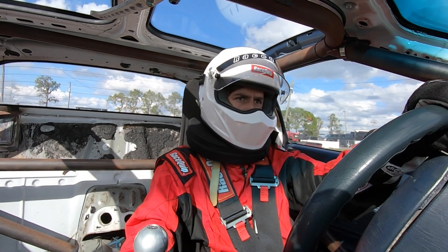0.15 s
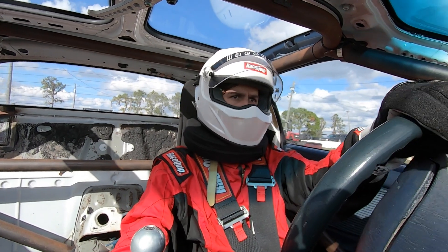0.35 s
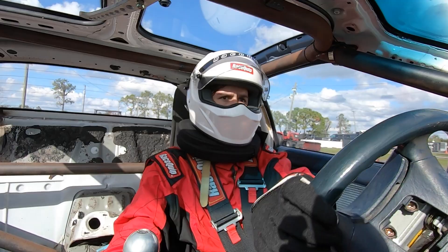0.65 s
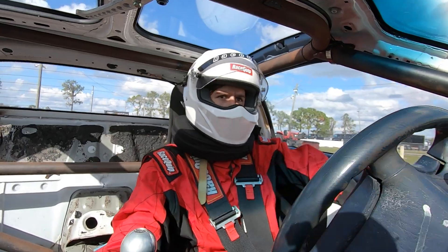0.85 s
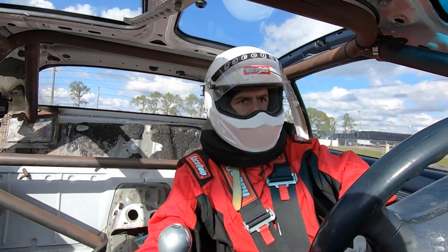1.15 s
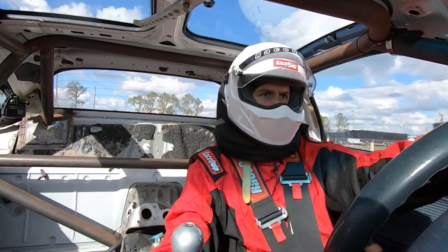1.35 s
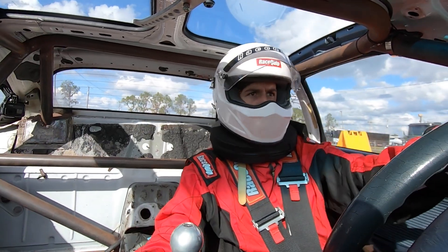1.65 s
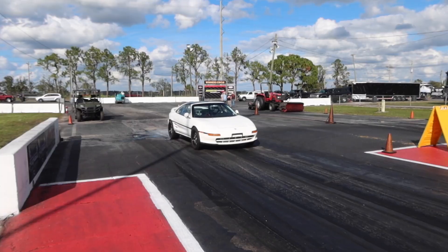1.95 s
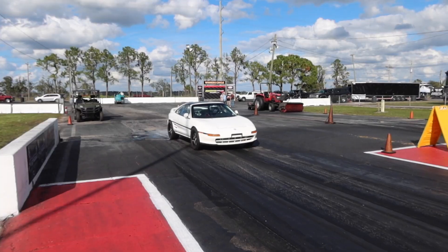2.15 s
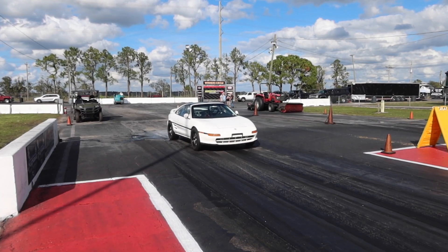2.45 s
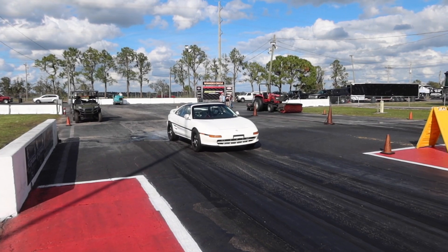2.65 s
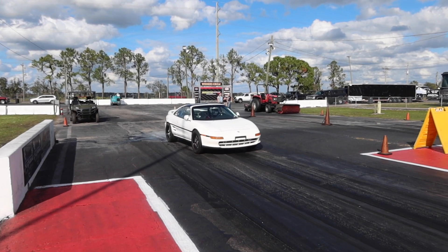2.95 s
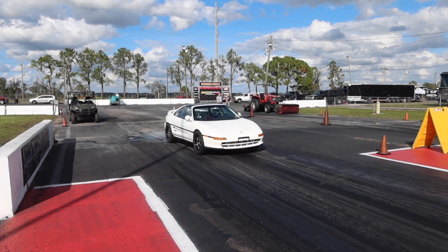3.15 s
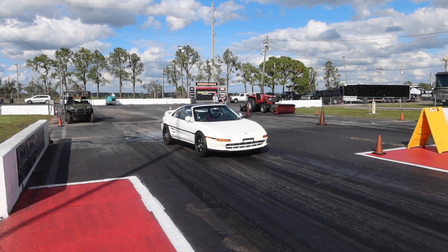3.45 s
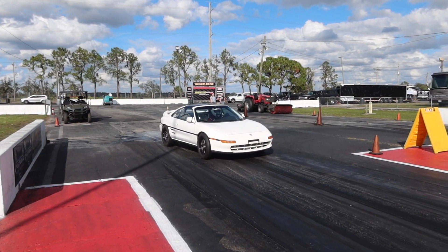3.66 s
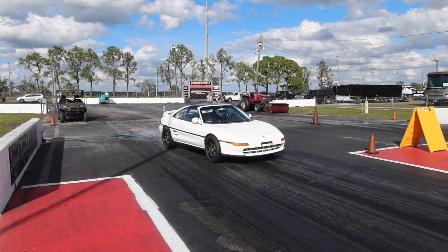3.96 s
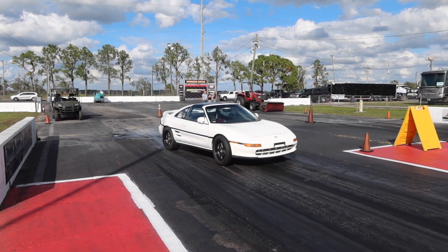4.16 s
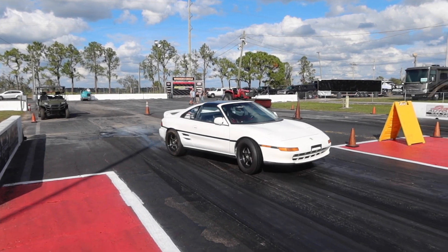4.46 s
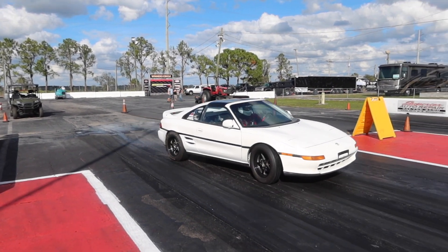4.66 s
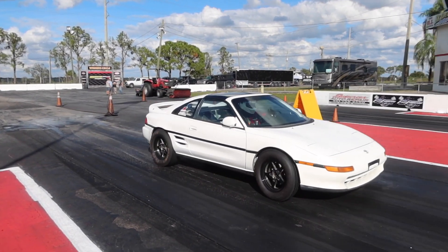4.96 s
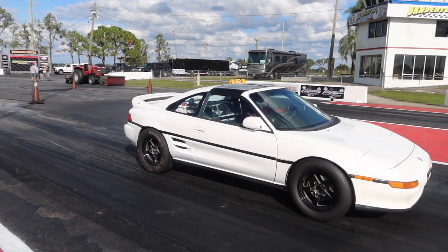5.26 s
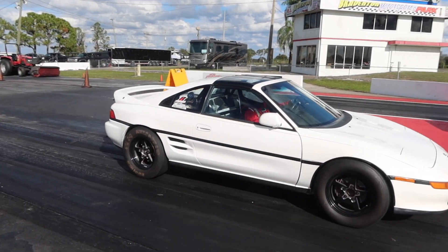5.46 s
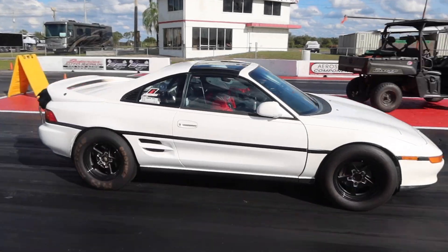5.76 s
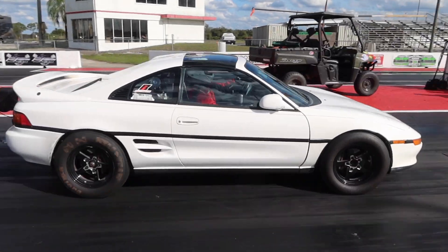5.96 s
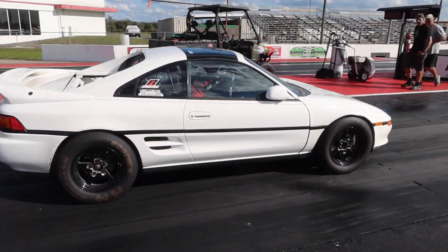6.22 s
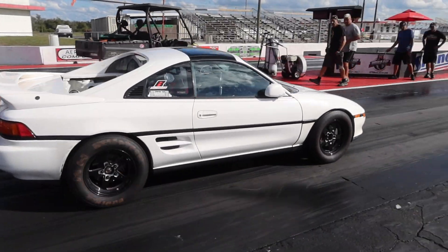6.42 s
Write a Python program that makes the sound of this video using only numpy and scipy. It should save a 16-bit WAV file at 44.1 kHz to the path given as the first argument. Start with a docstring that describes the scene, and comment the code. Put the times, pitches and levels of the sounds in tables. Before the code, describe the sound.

Boomy cabin revving with hiss and rattling shake cuts to trackside limiter stutter, sharp exhaust bangs, a brief rev peak, then lumpy idle.

```python
"""In the stripped cabin of a turbocharged four-cylinder drag car, then beside the strip, on a stereo microphone pair.
Inside: a rev, a short pull and a fall to idle, with hiss and body shake. Outside, in open air: the car stutters on
the launch limiter, revs up, bangs, spins its howling tyres, vents boost, lifts off and rolls past at idle.
The engine is clear orders, filtered firing clicks, puffs of noise and a repeated cycle; bangs are shock fronts with
noise bursts, tyres are sagging tones, and the hisses, shake and air are filtered noise."""
import sys
import numpy as np
from scipy import signal
from scipy.fft import rfft, irfft, next_fast_len
from scipy.io import wavfile
from scipy.ndimage import uniform_filter1d, minimum_filter1d

SR = 44100
rng = np.random.default_rng(int(sys.argv[2]) if len(sys.argv) > 2 else 0)


def wav_out(sig):
    """Save sig, one row per channel (or a flat mono array), as 16-bit PCM at SR to the path in sys.argv[1]."""
    wavfile.write(sys.argv[1], SR, np.round(np.clip(np.atleast_2d(sig).T, -1, 1) * 32767).astype(np.int16))


N = 290619
T = np.arange(N) / SR
HZ = np.fft.rfftfreq(N, 1 / SR)

# moments of the take-over from cabin to trackside, and of the drive [s]
OUTSIDE_S, LIFT_OFF_S, IDLE_S, PASSED_S = 1.926, 4.63, 5.16, 6.25
BOG_START_S, BOG_END_S = 2.44, 2.73  # the engine bogs and its second order comes forward
EDGE_HZ = 15600  # upper band limit

# likeness of the two microphones' noise: (frequency [Hz], left-right correlation)
MIC_LIKENESS = [(100, .985), (350, .95), (700, .5), (1400, .45), (2800, .62), (5000, .42), (10000, .1)]
# narrowing in the open: (frequency [Hz], change of the left-right difference [dB])
OPEN_WIDTH = [(100, -38), (200, -26), (380, -15), (700, -18), (1300, -20), (2400, -14), (4400, -4),
              (8000, -3), (15000, -1)]
# colour of the open-air background: (frequency [Hz], level [dB])
AIR_COLOUR = [(20, -60), (90, 1.5), (300, 0), (900, -8.5), (3000, -13.5), (8000, -30.5), (15000, -46)]
# sound scattered nearby, against the direct sound: (frequency [Hz], level [dB])
SCATTER = [(100, -21), (300, -18), (600, -4), (1200, -1), (2800, -4), (6000, -14)]
OPEN_SCATTER_DB = -12  # change of the scatter in the open
# random fine ripple across the treble's spectrum: depth and spacing
TREBLE_RIPPLE_DB, TREBLE_RIPPLE_HZ = 1.9, 60

# jolts of the body shell, before trim: (time [s], hold [s], level [dB], decay [s])
SHAKE_JOLTS = [(.16, 0.021, -15, 0.1), (.59, 0.066, -26, 0.032), (.96, 0.15, -22, .06),
               (1.7, 0.069, -28, 0.018), (1.86, 0.072, -28.5, .02)]
# colour of the shake: (frequency [Hz], level [dB])
SHAKE_COLOUR = [(10, -13), (22, -1), (45, -11), (75, -25), (130, 0), (300, -62)]
TREMBLE_DB = -60  # steady shake between jolts, before trim

# bursts of vented boost in the cabin, before trim: (time [s], hold [s], level [dB], decay [s])
CABIN_VENTS = [(.175, 0.013, -25, 0.013), (.87, 0.18, -29, 0.24), (1.33, 0.055, -33.5, 0.048)]
# colour of the cabin hiss: (frequency [Hz], level [dB])
CABIN_HISS_COLOUR = [(2500, 0.5), (4500, 2), (6500, 2), (10000, -3.5), (11500, -17.5), (14500, -22),
                     (15500, -42)]
HISS_UNDER_RASP_DB = -3.5  # steady intake hiss in the cabin against the rasp, before trim
# bursts of vented boost at the trackside: (peak time [s], half length [s], level [dB], centre [Hz])
TRACK_VENTS = [(3.687, 0.053, -41.5, 14200), (3.822, 0.05, -40, 13000), (3.936, 0.09, -51, 12500),
               (4.06, .022, -46, 11500), (4.134, .018, -35.5, 8600), (4.191, 0.039, -33, 8400),
               (4.254, 0.021, -34.5, 7500), (4.24, 0.21, -42, 13000), (4.314, .02, -36, 10000),
               (4.528, 0.026, -39, 12000), (4.593, 0.051, -39.5, 9000)]
# colour of the trackside hiss: (frequency [Hz], level [dB])
TRACK_HISS_COLOUR = [(3000, -3), (5000, -2), (7000, -2.5), (9500, -3), (11500, -5), (14000, -11),
                     (15700, -11)]
VENT_Q, VENT_WASH_DB = 3.3, -7  # sharpness of each burst's centre, and the wide hiss around it
# thin hiss once the throttle shuts: (time [s], centre [Hz], level [dB])
WHIRR = [(4.55, 7800, -78), (4.7, 7600, -58), (4.9, 7000, -64), (5.1, 6200, -65), (5.35, 6300, -65),
         (5.6, 6500, -58), (6.1, 6400, -66), (6.59, 6600, -63)]

# howls of the spinning slicks: (peak time [s], half length [s], pitch at the peak [Hz], level [dB], overtones [dB])
HOWLS = [(0.534, 0.06, 241.5, -26.5, -3), (0.842, 0.16, 249.1, -19, -10.5), (4.471, 0.11, 258.5, -21, -32),
         (4.604, 0.031, 251.4, -18, -22)]
HOWL_SAG_HZ_PER_S = 62
# unburnt fuel exploding in the pipe: (time [s], level [dB], decay [s], share of bright snap [0-1])
BANGS = [(1.975, -23, 0.0051, 0.26), (2.153, -24, 0.0068, 0.19), (2.287, -29, 0.0052, .3),
         (2.333, -20.5, 0.0048, 0.1), (2.847, -26, 0.0042, 0.05), (3.059, -11, 0.0066, 0.15),
         (3.12, -12.5, 0.0036, 0.37), (3.267, -12, 0.0059, 0), (3.298, -14, 0.0022, 0),
         (3.412, -12, 0.0043, 0), (3.516, -18, 0.0016, 1), (3.519, -6, 0.0054, 0.2),
         (3.578, -19.5, 0.0038, 0.6), (3.866, -4.5, 0.0044, 0.47), (3.881, -10, 0.0025, 0.4),
         (3.897, -13, 0.0034, 0.34), (3.929, -8, 0.0047, 0.37)]
# colour of the burst: (frequency [Hz], level [dB])
BANG_COLOUR = [(60, -18), (130, 11), (500, 13), (1400, 11.5), (2700, -4), (4500, -41), (8000, -20.5),
               (15000, -42)]
# colour of the snap: (frequency [Hz], level [dB])
SNAP_COLOUR = [(400, -20), (1200, 0), (2500, 0), (4500, -8), (8000, -19), (11000, -36), (15000, -50)]

# engine speed in the cabin: (time [s], firing rate [1/s])
CABIN_SPEED = [(0.0, 275.3), (0.1, 317.0), (0.17, 335.0), (0.27, 325), (0.33, 294), (0.4, 273), (0.47, 234),
               (0.6, 240), (0.86, 216), (0.9, 176.2), (0.98, 146), (1.171, 121.5), (1.317, 106.5),
               (1.423, 91), (1.505, 83), (1.6, 69), (1.925, 65.7)]
# trackside speed, on the limiter with one bog, then the pull and fall to idle: (time [s], firing rate [1/s])
TRACK_SPEED = [(1.926, 234), (2.4, 238.2), (2.446, 204), (2.48, 193), (2.535, 158), (2.6, 172), (2.69, 190),
               (2.75, 205), (2.86, 230), (3.53, 224), (3.6, 246), (3.7, 286), (3.82, 335), (3.89, 333),
               (4.0, 299), (4.09, 260), (4.16, 242), (4.3, 239.4), (4.413, 226.1), (4.52, 223), (4.65, 149),
               (5.086, 94.5), (5.277, 73), (5.5, 67), (5.65, 61), (5.85, 57.5), (6.0, 50), (6.25, 52),
               (6.59, 56.7)]
# exhaust in the cabin: (time [s], bass [dB], bark [dB])
CABIN_LEVEL = [(0.0, -10, -24.5), (0.09, -11, -25.5), (0.36, -13.5, -25.5), (0.65, -13, -22.5),
               (0.74, -11, -27.5), (0.85, -9.5, -29.5), (0.98, -15.5, -30), (1.3, -10, -31.5),
               (1.5, -13, -39.5), (1.75, -24.5, -42), (1.92, -17, -40)]
# exhaust at the trackside: (time [s], bass [dB], bark [dB])
TRACK_LEVEL = [(1.926, -19, -24), (2.02, -18, -25.5), (2.26, -23, -27), (2.33, -18, -25.5),
               (2.6, -15.5, -29.5), (2.75, -14, -24.5), (3.5, -15, -24.5), (3.76, -13, -21),
               (3.92, -18, -25), (4.025, -16.5, -30), (4.1, -24, -34), (4.16, -21, -29), (4.49, -16, -25),
               (4.66, -20.5, -34.5), (5.05, -23.5, -41), (5.3, -31.5, -46.5), (5.58, -33, -45),
               (5.8, -32.5, -46), (6.27, -28.5, -45), (6.59, -23.5, -39)]
# the rasp follows the bark: dB at a bark of 0 dB, dB per dB, extra dB in the cabin
RASP_DB, RASP_SLOPE, CABIN_RASP_DB = -16, 0.74, 8
BOOM_DB, ROUGH_BOOM_DB = -14.5, 13  # smooth boom against the bass, and what roughness 1 adds

# cylinders in firing order: (strength, extra travel time in the manifold [ms])
CYLINDERS = [(0.37, 0.036), (0.38, 0.21), (0.64, 0.073), (0.28, 0.29)]
# spells of uneven firing: in the cabin, on the limiter, in the bog and pull, on the overrun and at idle:
# (start [s], end [s], roughness [0 to about 1], share dropped [0-1])
STUMBLES = [(0.078, 0.221, 0.45, .22), (0.423, 0.704, 0.61, 0.026), (0.926, 1.038, 0.64, .08),
            (1.65, 1.845, 0.27, .08), (1.919, 2.446, 1.03, 0.31), (2.447, 2.699, 0.45, .05),
            (2.844, 2.937, 0.97, 0.22), (2.975, 3.168, 0.89, 0.43), (3.221, 3.329, 0.92, 0.31),
            (3.354, 3.446, 0.78, 0.39), (3.474, 3.503, 0.99, 0.47), (3.558, 3.803, 0.22, .03),
            (3.805, 3.946, 0.75, 0.3), (4.518, 4.651, 0.79, 0.24), (4.643, 5.22, .25, 0.022),
            (5.223, 6.703, 0.25, 0.067)]
STUMBLE_FADE_S = 0.026
SCATTER_SMOOTH, SCATTER_ROUGH = 0.016, 0.19  # spread of firing strength, and what roughness 1 adds
ROUGH_TIMING_MS = .13  # spread of firing times at roughness 1
SPEED_HUNT = .028  # relative wander of the speed at roughness 1
# longer ignition cuts, and a few swells, before levelling: (time [s], half length [s], change [dB])
CUTS = [(1.964, 0.013, -5.5), (2.072, 0.0092, -8), (2.126, 0.01, -8), (2.268, 0.022, -6),
        (2.329, 0.0071, -10.5), (2.399, 0.016, -3), (2.605, 0.016, 1), (2.894, 0.0069, -8.5),
        (2.921, 0.0012, 5), (2.985, 0.0044, 3), (3.13, 0.025, -6), (3.257, 0.013, -4.5),
        (3.293, 0.0071, -6.5), (3.386, 0.02, -4), (3.48, 0.0078, -4.5), (3.503, 0.004, -6),
        (3.858, 0.0031, 6), (3.913, 0.015, -0.5)]
# burbles at idle, before levelling: (time [s], lift [dB])
BURBLES = [(5.615, 0.5), (5.858, 7), (5.934, 7), (6.2, 0), (6.465, 2), (6.54, 5.5)]
BURBLE_HALF_S = 0.0066
GAS_DB_PER_OCTAVE, GAS_PIVOT_HZ = -1, 135  # at high revs the pulses outgrow the rush of gas
PUFF_MOST_DB = 6  # the largest puff of gas above the usual one

# clear engine orders: [multiples of the firing rate]
ORDERS_HEARD = [.5, .75, 1, 1.5, 2, 2.5, 3, 3.5, 4]
# the strongest orders, taken out of the clicks: [multiples of the firing rate]
MAIN_ORDERS = [1, 1.5, 2, 3]
# each clear order against the bass: (cabin [dB], on power [dB], overrun [dB], idle [dB],
# change at roughness 1 [dB], change under boost [dB], change while bogging [dB], waver [dB])
ORDER_DB = [(-26.5, -33, -38, -49, 24, 5.5, -13, 5), (-17.5, -18.5, -47, -38, 2.5, -2, -4, 3.5),
            (-0.5, 2.55, 1.5, -1.5, -15.5, -1, -2.5, 0.92), (-26, -24, -24, -15, 10, -4.5, -9, 4.5),
            (-20, -19.5, -27, -6.5, -0.5, 6.5, 5, 2), (-39.5, -37, -24, -39, 4, 8, 10, 3.5),
            (-23, -23.5, -32.5, -16, 0, 4.5, -3, 3.5), (-59, -50, -24, -22.5, 2, 6, 6, 3),
            (-35.5, -52, -42, -21, -2, 15, 4, 5.5)]
# hard revving under boost, when the overtones snarl: (start [s], end [s])
BOOST = [(-.1, 0.325), (3.56, 3.85)]
BOOST_FADE_S = 0.055
# spells under load with the whole engine cycle's partials clear: (start [s], end [s], level against the gas [dB])
SNARLS = [(-.1, 0.96, -6), (1.1, 1.39, -3), (2.452, 2.856, -4.5), (3.588, 3.842, -6), (4.13, 4.52, -6)]
SNARL_FROM_HZ, SNARL_TO_HZ = 480, 2900

# resonances that lift the upper orders crossing them, in four stages: (centre [Hz], width [Hz], lift [dB])
CABIN_DRONES = [(209.4, 15, 11), (706, 8.5, 8.5), (498, 34, 4.5)]
POWER_DRONES = [(384.5, 23, 8.5), (334, 55, 6.4), (710, 51, 7.5), (906, 66, 2)]
OVERRUN_DRONES = [(325.1, 30.7, 13.5)]
IDLE_DRONES = [(206.3, 17, 11.3), (169, 20, 6.8)]
# colour of the exhaust in the same four stages: (frequency [Hz], level [dB])
CABIN_COLOUR = [(30, -9), (80, 6.5), (120, -1.5), (180, 10.5), (270, 5.5), (400, -7.5), (500, -5.5),
                (590, -10.5), (720, -7.5), (850, -10.5), (1200, -11), (1600, -19), (2050, -22),
                (3300, -22.5), (4500, -28.5), (7000, -81)]
POWER_COLOUR = [(40, -39), (80, -7), (125, -1), (200, -4.5), (380, -3.5), (500, -10.5), (800, -3.5),
                (1400, -18), (2300, -15.5), (3200, -20.5), (4500, -26.5), (7000, -33.5), (10000, -42),
                (15000, -47.5)]
OVERRUN_COLOUR = [(40, -43), (80, -11), (130, 3), (210, 17.5), (270, -5), (335, 8), (385, -8), (460, -25),
                  (550, -18), (800, -13), (1150, -30.5), (1550, -25.5), (2000, -27.5), (3000, -17),
                  (4500, -22.5), (8000, -33.5), (15000, -46.5)]
IDLE_COLOUR = [(40, -30), (80, 8), (120, 13), (170, 14.5), (220, 5), (270, -2.5), (350, 0), (450, -12.5),
               (560, -24.5), (850, -9.5), (1200, -28), (1600, -23), (2000, -27.5), (3000, -26.5),
               (4300, -29.5), (6500, -41.5), (9000, -46.5), (15000, -53)]
# exhaust pipe resonances, before each stage's share: (centre [Hz], width [Hz], lift [dB])
PIPE_MODES = [(139.3, 4.5, 14), (231.3, 8, 18.5), (376, 9.8, 5.5), (709, 36, 5), (920, 30, 4),
              (1388, 68, 13.5), (2990, 29, 3.5)]
# engine bay, ringing once the throttle shuts, before each stage's share: (centre [Hz], width [Hz], lift [dB])
BAY_MODES = [(404, 20.7, 3.5), (664, 46, 5.5), (970, 54.8, 6.5), (1530, 46, 8.5), (1616, 47, -1.5),
             (2160, 170, 7.5), (2829, 56, 0.5), (3900, 60, -3), (5060, 120, 3)]
# tailpipe facing the microphones once the car has passed: (centre [Hz], width [Hz], change [dB])
TAILPIPE_MODES = [(195, 37, -3.5), (430, 48, 9.5)]


def amp(db):
    """Decibels to gain."""
    return np.exp(np.asarray(db) * (np.log(10) / 20))


def curves(rows):
    """The columns of a time table at every sample."""
    s, *columns = np.transpose(rows)
    return [np.interp(T, s, c) for c in columns]


def read(points):
    """A spectrum table at every frequency, on a logarithmic axis."""
    f, value = np.transpose(points)
    return np.interp(np.log(HZ + 1), np.log(f), value)


def smooth(x, seconds):
    """Triangular moving average."""
    size = max(int(seconds * SR), 1)
    return uniform_filter1d(uniform_filter1d(x, size), size)


def unit(x):
    """Scales to rms 1."""
    return x / np.sqrt(np.mean(x ** 2) + 1e-20)


def steady(x, seconds=0.15):
    """Holds the slow level of a stereo sound at rms 1."""
    return x / np.sqrt(abs(smooth((x ** 2).mean(0), seconds)) + 1e-14)


def shape(x, gain):
    """Filters by a gain at every frequency."""
    size = next_fast_len(N + 8192, True)
    spectrum = rfft(x.astype(np.float32), size)
    spectrum *= np.interp(np.fft.rfftfreq(size, 1 / SR), HZ, gain)
    return irfft(spectrum, size)[..., :N].astype(float)


def below(hz, order=5):
    """Gain of a low-pass, steep by default."""
    return 1 / np.sqrt(1 + (HZ / hz) ** (2 * order))


def above(hz):
    """Gain of the matching high-pass."""
    return np.sqrt(1 - below(hz) ** 2)


def after(s, seconds):
    """Fades from 0 to 1 around a moment."""
    return np.clip((T - s) / seconds + .5, 0, 1)


def during(start, end, fade_s):
    """Is 1 within a spell and 0 outside it, with faded edges."""
    return after(start, fade_s) - after(end, fade_s)


def bumps(rows):
    """Sum of brief bell-shaped changes of level, in dB."""
    total = np.zeros(N)
    for s, half, db in rows:
        span = slice(max(int((s - 4 * half) * SR), 0), int((s + 4 * half) * SR))
        total[span] += db * np.exp(-((T[span] - s) / half) ** 2)
    return total


def bursts(rows, attack_s):
    """Gain of events that rise, hold and die away."""
    gain = np.zeros(N)
    for s, hold, db, decay in rows:
        rise = np.clip((T - s) / attack_s, 0, 1)
        gain += amp(db) * rise * np.exp(-np.maximum(T - s - hold, 0) / decay)
    return gain


def resonances(modes):
    """Summed lift of resonance peaks at every frequency, in dB."""
    return sum(db / (1 + ((HZ - hz) / width) ** 2) for hz, width, db in modes)


def noise():
    """White noise on both microphones, alike in the bass and wide in the treble."""
    mid, side = rng.standard_normal((2, N))
    same = np.clip(read(MIC_LIKENESS), -1, 1)
    mid = shape(mid, np.sqrt((1 + same) / 2))
    side = shape(side, np.sqrt((1 - same) / 2))
    return np.array([mid + side, mid - side])


def narrowed(x):
    """Nearly mono below the treble, as a single source sounds in the open."""
    mid = (x[0] + x[1]) / 2
    side = shape((x[0] - x[1]) / 2, amp(read(OPEN_WIDTH)))
    return np.array([mid + side, mid - side])


def treble_ripple():
    """Gain of a random fine ripple over frequency, drawn anew at each call."""
    grid = np.arange(0, SR / 2, TREBLE_RIPPLE_HZ)
    return amp(TREBLE_RIPPLE_DB * np.interp(HZ, grid, rng.standard_normal(len(grid))))


def reflections(x, decay_s=0.021):
    """Nearby panels and walls scatter the sound, differently at each microphone and less in the open."""
    t = np.arange(SR // 8) / SR
    taps = rng.standard_normal((2, len(t))) * (rng.random((2, len(t))) < .03) * np.exp(-t / decay_s)
    taps /= np.linalg.norm(taps, axis=1, keepdims=True)
    echo = signal.fftconvolve(x, taps, axes=1)[:, :N]
    out = after(OUTSIDE_S, .005)
    places = [(1 - out, amp(read(SCATTER))), (out, amp(read(SCATTER) + OPEN_SCATTER_DB))]
    return sum(share * shape(x + shape(echo, wet), 1 / np.sqrt(1 + wet ** 2)) for share, wet in places)


def open_air():
    """Steady background of the open strip: coloured noise."""
    return amp(-46.0) * unit(shape(noise(), amp(read(AIR_COLOUR))))


def rush(gain, colour, trim_db, flutter_db):
    """Turbulent noise that flutters."""
    flutter = flutter_db * unit(smooth(rng.standard_normal(N), 0.023))
    return gain * amp(trim_db + flutter) * unit(shape(noise(), amp(read(colour)) * treble_ripple()))


def body_shake():
    """Jolts of the body shell over a faint tremble, as low noise."""
    gain = amp(TREMBLE_DB) + bursts(SHAKE_JOLTS, attack_s=0.0098)
    return rush(gain, SHAKE_COLOUR, trim_db=3.0, flutter_db=1.5)


def cabin_hiss(rasp):
    """Intake hiss that follows the rasp, with bursts of vented boost."""
    gain = np.hypot(amp(rasp + HISS_UNDER_RASP_DB), bursts(CABIN_VENTS, attack_s=0.013))
    return rush(gain, CABIN_HISS_COLOUR, trim_db=1.5, flutter_db=0.75)


def whirr(blur_s=.0009, waver_db=2, wander_hz=120):
    """A narrow band of hiss, noise on a carrier, that wanders about its changing centre."""
    hz, db = curves(WHIRR)
    drift, swell = (unit(smooth(v, .06)) for v in rng.standard_normal((2, N)))
    carrier = np.sin(2 * np.pi * np.cumsum(hz + wander_hz * drift) / SR)
    band = unit(smooth(rng.standard_normal((2, N)), blur_s) * carrier)
    return amp(db + waver_db * swell) * band


def vents():
    """Each burst of vented boost swells and fades, fluttering around its own pitch."""
    air = rush(1, TRACK_HISS_COLOUR, trim_db=0, flutter_db=4.5)
    sound = np.zeros((2, N))
    for s, half, db, hz in TRACK_VENTS:
        span = slice(int((s - 3 * half) * SR), int((s + 3 * half) * SR))
        jet = signal.lfilter(*signal.iirpeak(hz, VENT_Q, SR), air[:, span])
        jet = jet + amp(VENT_WASH_DB) * air[:, span]
        sound[:, span] += amp(db) * np.exp(-((T[span] - s) / half) ** 2) * unit(jet)
    return sound


def tyres(third_db=-3, waver=0.01535):
    """Rubber sticks and slips in a wavering, sagging tone that swells and beats against the engine."""
    wobble = 1 + waver * unit(smooth(rng.standard_normal(N), 0.0183))
    sound = np.zeros(N)
    for s, half, hz, db, overtones_db in HOWLS:
        on = abs(T - s) < 3 * half
        t = T[on] - s
        phase = 2 * np.pi * np.cumsum((hz - HOWL_SAG_HZ_PER_S * t) * wobble[on]) / SR
        tone = amp([0, overtones_db, overtones_db + third_db]) @ np.sin(np.outer([1, 2, 3], phase))
        sound[on] += amp(db) * np.exp(-(t / half) ** 2) * unit(tone)
    return sound


def backfires(front_db=-2, front_s=0.0003):
    """A shock front, a burst of gas with a bright snap, and a short tail from the strip's walls."""
    level, snap, front = np.zeros((3, N))
    age = T[:SR // 2]
    for s, db, decay, bright in BANGS:
        span = slice(round(s * SR), round(s * SR) + SR // 2)
        fall = np.exp(-age / decay)
        tail = 0.02 * np.exp(-age / 0.11)
        level[span] += amp(db) * (1 - np.exp(-age / 0.00032)) * (fall + tail)
        snap[span] += amp(db) * bright * np.minimum(age / 0.001, 1) * fall
        front[span] += amp(db + front_db) * (1 - age / front_s) * np.exp(-age / front_s)
    burst = level * unit(shape(noise(), amp(read(BANG_COLOUR))))
    burst += snap * unit(shape(noise(), amp(read(SNAP_COLOUR))))
    return burst + shape(front, below(3200, order=3))


def drive():
    """Firing rate and the exhaust's bass, bark and rasp in dB, in the cabin and then outside."""
    out = after(OUTSIDE_S, 0.0073)
    rate = np.where(T < OUTSIDE_S, curves(CABIN_SPEED)[0], curves(TRACK_SPEED)[0])
    bass, bark = (1 - out) * np.array(curves(CABIN_LEVEL)) + out * np.array(curves(TRACK_LEVEL))
    rasp = RASP_DB + RASP_SLOPE * bark + (1 - out) * CABIN_RASP_DB
    return rate, bass, bark, rasp


def stumbling():
    """Roughness and share of dropped firings at every sample."""
    spells = [(during(start, end, STUMBLE_FADE_S), rough, share) for start, end, rough, share in STUMBLES]
    roughness = np.max([on * rough for on, rough, _ in spells], 0)
    dropped = np.max([on * share for on, _, share in spells], 0)
    return roughness, dropped


def firings(rate, turns):
    """One click a firing; cylinders differ in strength and path, and uneven spells drop some."""
    at = np.flatnonzero(np.diff(np.floor(turns)) > 0)
    rough, dropped = (c[at] for c in stumbling())
    strength, late_ms = np.array(CYLINDERS)[np.arange(len(at)) % len(CYLINDERS)].T
    luck = rng.random(4000)[:len(at)]
    spread = rng.standard_normal(4000)[:len(at)]
    late_ms = late_ms + ROUGH_TIMING_MS * rough * rng.standard_normal(4000)[:len(at)]
    at = np.clip(at + np.round(late_ms * SR / 1000).astype(int), 0, N - 1)
    strength = strength * (1 + (SCATTER_SMOOTH + SCATTER_ROUGH * rough) * spread) * (luck >= dropped)
    clicks = np.bincount(at, strength, N) / np.sqrt(rate / SR)
    # the main orders are voiced apart, so they are taken out of the clicks
    for order in MAIN_ORDERS:
        phase = 2 * np.pi * order * turns
        for wave in (np.cos(phase), np.sin(phase)):
            clicks = clicks - 2 * wave * smooth(clicks * wave, 0.035)
    return clicks - smooth(clicks, 0.024)


def gas_puffs(rate, turns, puff_turns=0.95, puff_spread_db=5.5):
    """Each firing lets out a puff of turbulent gas of its own size, over a steady rush."""
    puff_db = np.minimum(puff_spread_db * rng.standard_normal(N)[turns.astype(int)], PUFF_MOST_DB)
    gas = unit(noise() * (4.7 + amp(puff_db) * np.exp(-(turns % 1) / puff_turns)))
    gas = gas * amp(GAS_DB_PER_OCTAVE * np.log2(rate / GAS_PIVOT_HZ))
    # pulses rule the low and middle range; gas takes over in the treble, and sooner at low revs
    slow = np.clip((150 - rate) / 70, 0, 1)
    treble = shape(gas, amp(read([(400, -12), (900, -6), (1600, -3), (2500, 0)])))
    return treble + slow * shape(gas, above(600))


def snarl(rate, turns, odd_db=-4, count=3):
    """The ragged pressure wave of one whole engine cycle, repeated while it slowly changes form."""
    size = 4096  # points in one cycle
    order = np.arange(size // 2 + 1) / len(CYLINDERS)
    # partials off the half orders are weaker
    gain = (order > 3) * (order < 20) * amp(odd_db * (order % .5 > 0))
    place = (turns / len(CYLINDERS) % 1 * size).astype(int)
    sound = np.zeros(N)
    for _ in range(count):
        cycle = irfft(gain * np.exp(2j * np.pi * rng.random(len(order))))
        sound += cycle[place] * smooth(rng.standard_normal(N), .06)
    load = sum(amp(db) * during(start, end, BOOST_FADE_S) for start, end, db in SNARLS)
    width = order[gain > 0].max() * rate / (SR / 2)  # share of the spectrum that its partials cover
    band = above(SNARL_FROM_HZ) * below(SNARL_TO_HZ, order=2)
    return shape(load * np.sqrt(width) * unit(sound), band)


def order_levels(rate, rough):
    """dB of each order against the bass: roughness shifts the balance, resonances lift orders crossing them."""
    out, shut, idle = after(OUTSIDE_S, 0.0054), after(LIFT_OFF_S, 0.27), after(IDLE_S, 0.06)
    stages = [1 - out, out - shut, shut - idle, idle]
    boost = sum(during(start, end, BOOST_FADE_S) for start, end in BOOST)
    bog = during(BOG_START_S, BOG_END_S, BOOST_FADE_S)
    levels = np.array(ORDER_DB)[:, :-1] @ [*stages, rough ** 2, boost, bog]
    upper = np.flatnonzero(np.array(ORDERS_HEARD) > 1)
    for share, drones in zip(stages, (CABIN_DRONES, POWER_DRONES, OVERRUN_DRONES, IDLE_DRONES)):
        on = np.flatnonzero(share)
        for k in upper:
            for hz, width, db in drones:
                offset = (ORDERS_HEARD[k] * rate[on] - hz) / width
                levels[k, on] += share[on] * db / (1 + offset ** 4)
    return levels


def exhaust(x):
    """The pipe's colour: through the cabin, then outside on power, on the overrun and at idle."""
    pipe_db, bay_db = resonances(PIPE_MODES), resonances(BAY_MODES)
    out, shut, idle = after(OUTSIDE_S, .005), after(LIFT_OFF_S, 0.16), after(IDLE_S, 0.081)
    passed = after(PASSED_S, 0.27)
    x = (1 - passed) * x + passed * shape(x, amp(resonances(TAILPIPE_MODES)))
    # (fade, colour, share of the pipe resonances, share of the bay resonances)
    stages = [(1 - out, CABIN_COLOUR, 0.027, 0), (out - shut, POWER_COLOUR, 0.85, 0),
              (shut - idle, OVERRUN_COLOUR, 0.52, 0.37), (idle, IDLE_COLOUR, 0.067, 0.68)]
    return sum(fade * shape(x, amp(read(colour) + pipe * pipe_db + bay * bay_db))
               for fade, colour, pipe, bay in stages)


def engine(rate, bass, bark, rasp):
    """Clear engine orders, firing pulses, puffs of gas and the snarl of the whole cycle."""
    rough = stumbling()[0]
    notes = order_levels(rate, rough)
    boom = bass + BOOM_DB + ROUGH_BOOM_DB * rough
    # the speed hunts while the engine misfires, and the crank always speeds up and slows a little
    rate = rate * (1 + SPEED_HUNT * rough * unit(smooth(rng.standard_normal(N), .025)))
    turns = np.cumsum(rate * (1 + .008 * unit(smooth(rng.standard_normal(N), .004)))) / SR
    cut_db = bumps(CUTS) + bumps([(s, BURBLE_HALF_S, db) for s, db in BURBLES])
    # the pipe and turbine smear each pulse: its bass trails its treble
    trail_s = .005 / (1 + HZ / 700)
    pulses = shape(firings(rate, turns), np.exp(-2j * np.pi * np.cumsum(trail_s) * HZ[1]))
    gas = gas_puffs(rate, turns)
    sound = exhaust(shape(pulses, below(2200, order=1)) + gas + snarl(rate, turns))
    low = shape(sound, below(450))
    mid = shape(sound, above(450) * below(1700))
    high = shape(sound, above(1700) * treble_ripple())
    # the cuts reach the bands unequally
    body = amp(boom) * steady(low * amp(cut_db))
    body += amp(bark) * steady(mid * amp(1.2 * cut_db))
    body += amp(rasp) * steady(high * amp(0.28 * cut_db))
    for order, db, (*_, waver_db) in zip(ORDERS_HEARD, notes, ORDER_DB):
        waver = waver_db * unit(smooth(rng.standard_normal(N), 0.0086))
        body += amp(bass + db + cut_db + waver) * np.sqrt(2) * np.sin(2 * np.pi * order * turns)
    return reflections(body)


def scene():
    """Engine and tyres in both places; hiss and shake in the cabin, bangs, hisses and air at the trackside."""
    rate, bass, bark, rasp = drive()
    car = engine(rate, bass, bark, rasp) + tyres()
    inside = car + cabin_hiss(rasp) + body_shake()
    outside = car + backfires() + vents() + whirr() + open_air()
    out = after(OUTSIDE_S, 0.012)
    return (1 - out) * inside + out * narrowed(outside)


def record(dry):
    """A fast limiter holds peaks near full scale; then soft ends and the band limit."""
    gain = smooth(minimum_filter1d(1 / np.maximum(abs(dry).max(0), 1), size=45), .0005)
    gain = gain * np.clip(np.minimum(T, T[-1] - T) / .003, 0, 1)
    band_limit = signal.firwin(511, EDGE_HZ, window=("kaiser", 9), fs=SR)
    return signal.oaconvolve(dry * gain, band_limit[None], "same")


dry = scene()
out = record(dry)
wav_out(out)
```